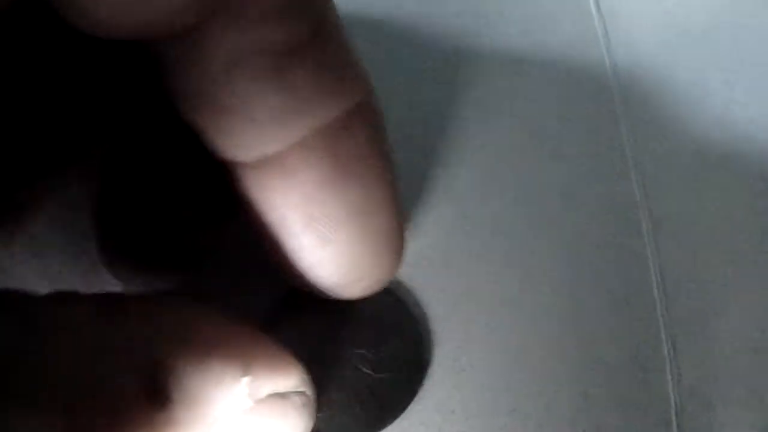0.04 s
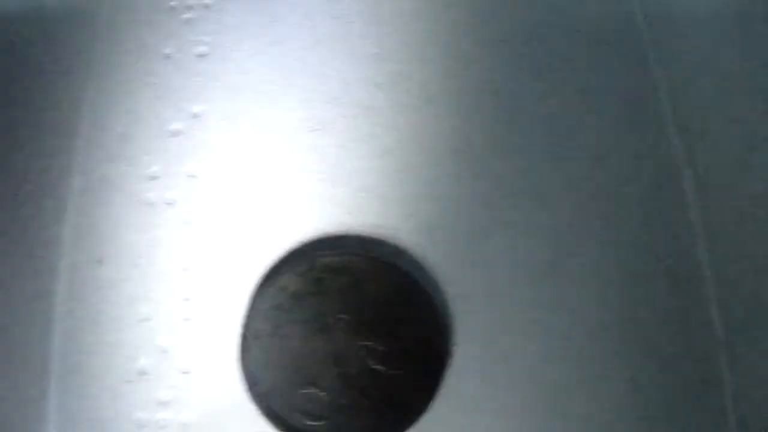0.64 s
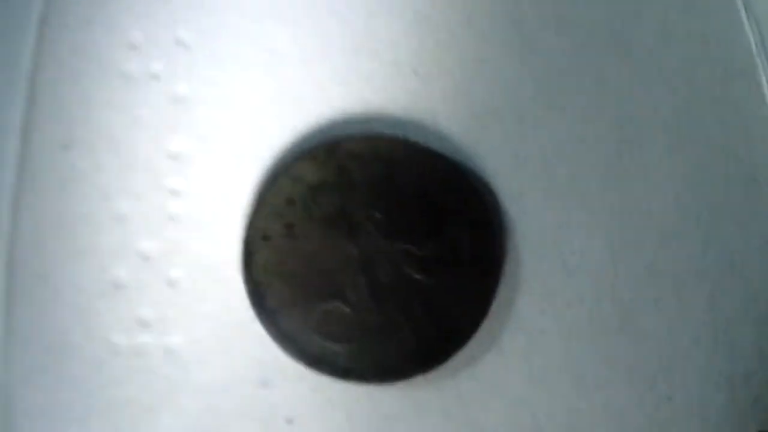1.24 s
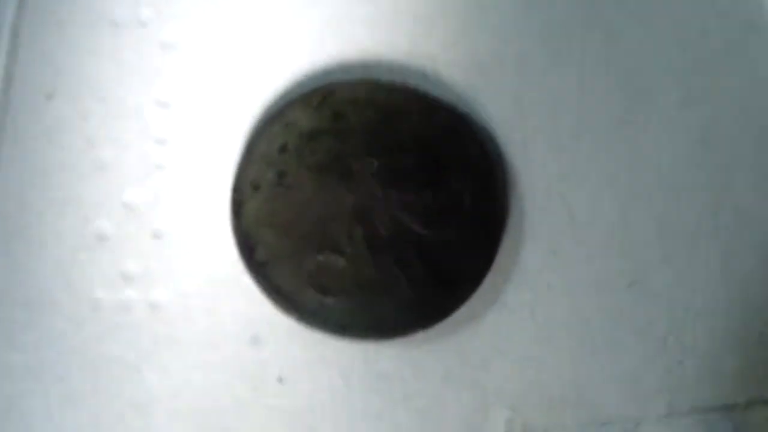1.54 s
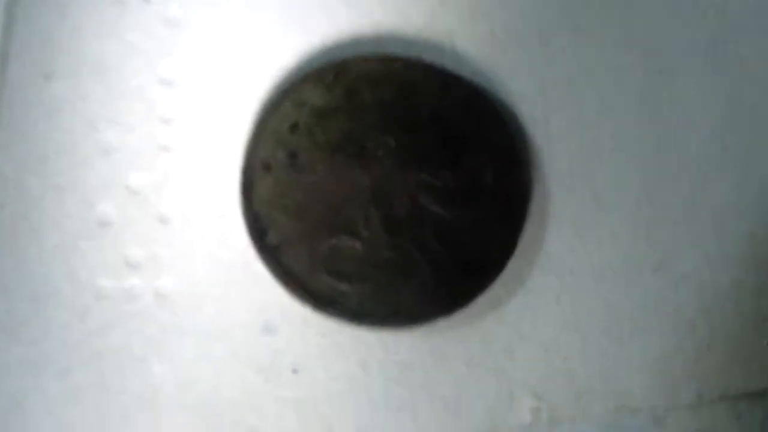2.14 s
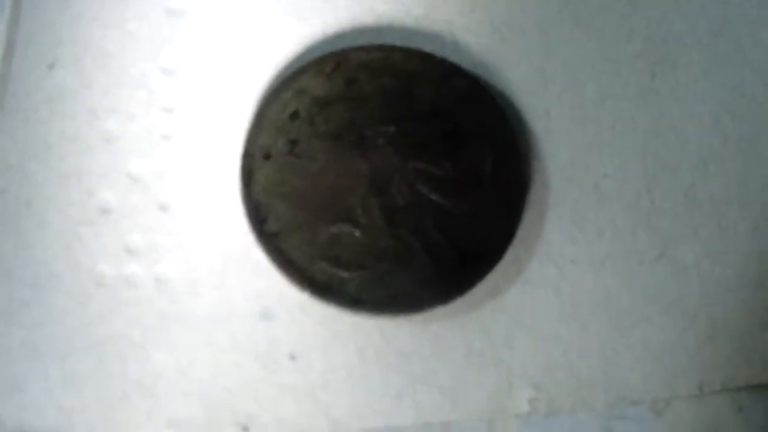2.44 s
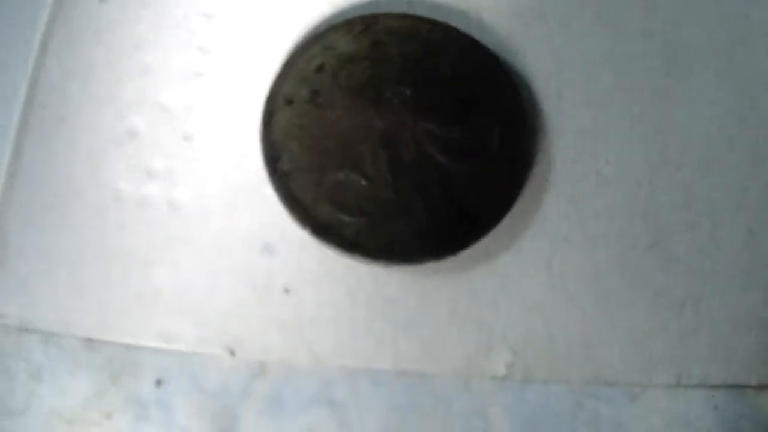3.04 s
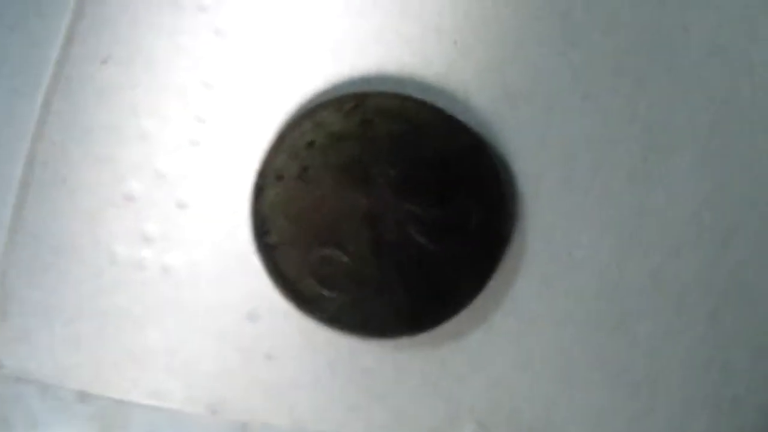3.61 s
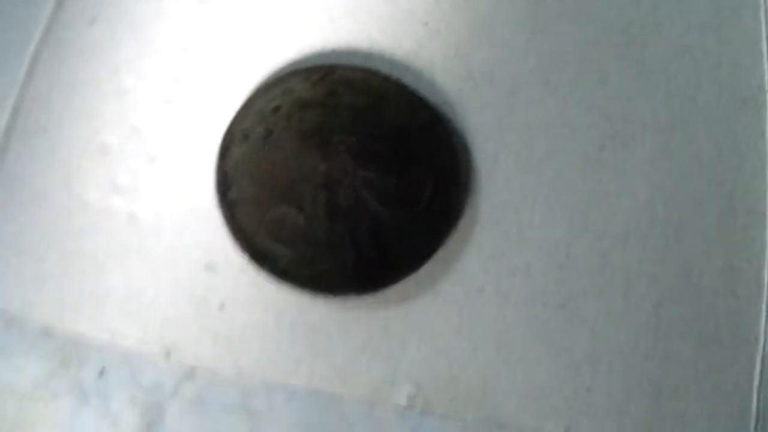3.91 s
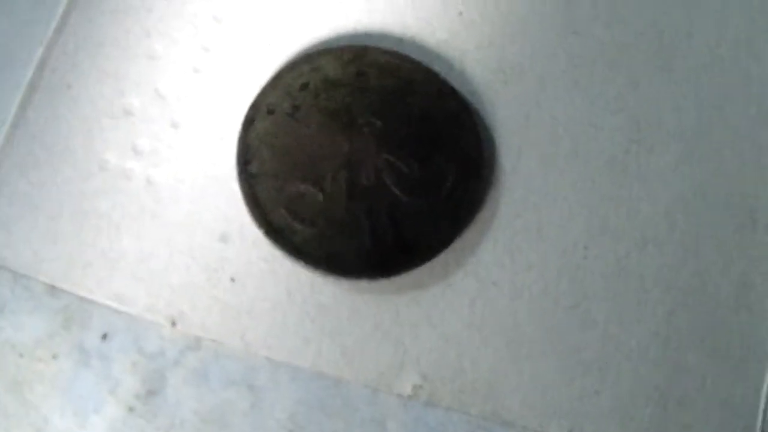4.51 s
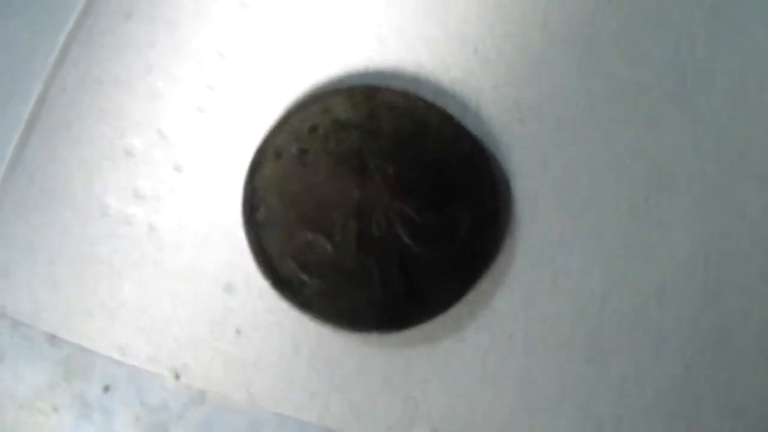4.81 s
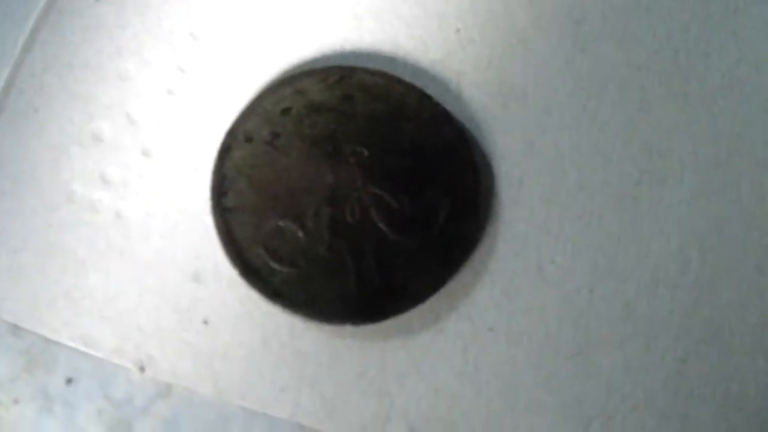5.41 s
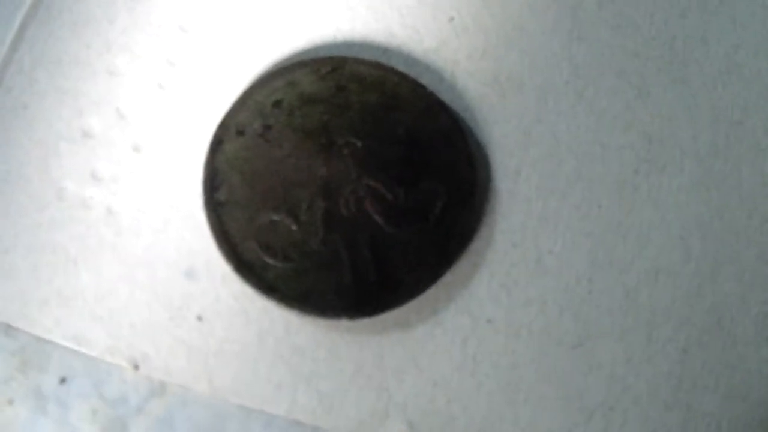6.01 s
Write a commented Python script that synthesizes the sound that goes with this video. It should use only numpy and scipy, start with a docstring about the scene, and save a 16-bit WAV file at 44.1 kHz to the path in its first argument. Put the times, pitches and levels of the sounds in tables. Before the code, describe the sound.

Quiet, dry handling noise is picked up from inside a small plastic camera. It opens with brief, hissy finger strokes on paper and on the casing, mixed with light ticks. After a short pause, a single sharp knock stands out as the loudest sound. The hand then scuffs on the plastic and a seam creaks in tiny slips between occasional clicks, until only the faint, constant microphone hiss remains.

```python
"""Soft finger strokes slide off a paper sheet and rub the plastic shell of a small hand-held camera.
The rubbing is skin friction; light clicks and one hard knock ring the shell's modes.
After the knock the grip scuffs and a seam creaks in small slips. The microphone sits inside
the shell, so all is dry, over a steady electronic hiss."""
import sys
import numpy as np
from scipy import signal
from scipy.fft import rfft, irfft
from scipy.io import wavfile
from scipy.ndimage import uniform_filter1d

SR = 44100
rng = np.random.default_rng(int(sys.argv[2]) if len(sys.argv) > 2 else 0)


def output_pcm(signal):
    """Save a mono or channel-first signal as 16-bit PCM at the path in sys.argv[1].

    Samples are clipped to [-1, 1] before scaling.
    """
    pcm = np.clip(np.atleast_2d(signal).T, -1, 1) * 32767
    wavfile.write(sys.argv[1], SR, np.round(pcm).astype(np.int16))


N = 276066
TIME = np.arange(N) / SR


def clicks(chatter_t60_s=0.014, soft_hz=1460, soft_chatter_db=-8, chatter_db_per_octave=6.5):
    """Each blow rings the shell; its edges chatter briefly, more after a hard contact."""
    # Each row: start in seconds, ring level in dB rms over 10 ms, high-pass in Hz, low-pass in Hz,
    # note of the struck spot in Hz, its boost in dB.
    blows = [(.7372, -37.5, 2220, 900, 1550, 36), (0.935, -47.5, 1900, 1300, 1520, 24),
             (1.665, -40.5, 218, 2900, 4080, 11.5), (1.806, -40, 1900, 3220, 1510, 13.5),
             (1.875, -47, 1110, 5500, 1940, 9), (3.1226, -16, 438, 1140, 2050, 10),
             (3.167, -50.5, 900, 1500, 1950, 19), (3.3141, -29.5, 754, 8500, 2590, 17.5),
             (3.8646, -51.5, 900, 2500, 1830, 12), (4.6608, -30.5, 1550, 6760, 1500, 7.5),
             (4.7762, -43.5, 300, 1610, 1610, 18), (5.3804, -31, 1140, 2130, 2660, 8.5),
             (5.391, -42, 1200, 1300, 2685, 10)]
    out, t = np.zeros(N), TIME[:SR // 10]
    for start_s, db, low_hz, high_hz, spot_hz, spot_db in blows:
        chatter = rng.standard_normal(len(t)) * gain_of(-60 * t / chatter_t60_s)
        chatter = cut(chatter, hz=700, kind="high", order=1)
        chatter = cut(chatter, hz=12500, kind="low", order=2)
        chatter_db = soft_chatter_db + chatter_db_per_octave * np.log2(high_hz / soft_hz)
        shell = shell_ring(low_hz, high_hz, spot_hz, spot_db)
        add(out, start_s, gain_of(db) * (shell + gain_of(chatter_db) * chatter))
    return out


def shell_ring(low_hz, high_hz, spot_hz, spot_db, lag_hz=1500):
    """Struck shell: a small contact drives no bass, a soft one no treble; each spot has its own note."""
    # Each row: mode frequency in Hz, level in dB, t60 in seconds.
    shell_modes = [(250, -8.5, .036), (347, -8, 0.033), (392, -12, 0.034), (593, -8, 0.042),
                   (840, -22, 0.056), (1096, 0, 0.028), (1302, -2.5, 0.018), (1496, -11, 0.013),
                   (1910, -13, 0.022), (2140, -11, 0.022), (2490, -5, 0.013), (3100, 7, 0.0026),
                   (4270, 6.5, 0.0041), (5780, -22, 0.02), (7550, 6.5, 0.0039), (10430, -8, .005)]
    sound = cut(ring(shell_modes), high_hz, "low", order=2)
    sound = cut(sound, low_hz, "high", order=3)
    spot_band = signal.lfilter(*signal.iirpeak(spot_hz, Q=8, fs=SR), sound)
    sound = sound + (gain_of(spot_db) - 1) * spot_band
    # All-pass: slower bending waves bring the mids in just after the treble.
    sound = 2 * signal.lfilter(*signal.iirpeak(lag_hz, Q=1.84, fs=SR), sound) - sound
    first_10_ms = sound[:SR // 100]
    return sound / np.sqrt(np.mean(first_10_ms ** 2))


def rubs(pad_hz=3950, pad_body_db=-8, body_db_per_octave=-5.5):
    """Finger strokes: pressing scrapes and stirs the shell, light fast sliding only hisses."""
    # Each row: peak time in seconds, half length in seconds, level in dB, pressure from 0 to 1,
    # scrape resonance in Hz, skin hiss resonance in Hz.
    finger_strokes = [(0.033, 0.032, -40, .58, 2950, 4040), (.128, 0.012, -38.5, 0.64, 1730, 4000),
                      (0.228, 0.056, -49.5, .68, 2620, 3930), (.335, 0.02, -49, 0.68, 2380, 4000),
                      (0.521, 0.023, -49.5, 0.64, 1940, 5000), (0.636, 0.015, -44.5, .5, 2570, 6200),
                      (0.699, 0.0027, -45.5, .08, 2500, 5960), (0.869, 0.11, -52, .08, 2500, 12200),
                      (1.153, 0.0048, -41.5, 0.48, 2250, 8000), (1.166, 0.0075, -40, 0.73, 2280, 8060),
                      (1.224, 0.065, -52.5, 0.66, 2260, 8000), (1.342, .028, -52, 0.35, 2440, 8500),
                      (1.563, .03, -43.5, 0.44, 2910, 6360), (1.587, 0.022, -41, 0.29, 3000, 10600),
                      (1.672, 0.017, -43, 0.47, 1290, 4200), (1.726, 0.088, -48, 0.5, 1640, 7060),
                      (1.826, 0.02, -48.5, 0.38, 2000, 10900), (1.896, 0.021, -46, 0.53, 1690, 8300),
                      (2.044, 0.03, -45.5, 0.58, 1650, 10900)]
    out = np.zeros(N)
    for peak_s, half_s, db, pressure, scrape_hz, skin_hz in finger_strokes:
        # A flat pad hisses low and stirs the shell; a fingertip hisses high and hardly stirs it.
        body_db = pad_body_db + body_db_per_octave * np.log2(skin_hz / pad_hz)
        gains = gain_of(db) * np.array([gain_of(body_db) * pressure, pressure, 1 - pressure])
        add(out, *stroke(peak_s, half_s, half_s, gains, scrape_hz, skin_hz, resonance_db=8.5))
    return out


def stroke(peak_s, rise_s, fall_s, gains, scrape_hz, skin_hz, resonance_db):
    """Friction swells and fades in three colours: shell body, scrape, skin hiss. Returns start, sound."""
    # Three spectra. Each row: frequency in Hz, relative density in dB.
    body_spectrum = [(60, -44), (180, -3), (350, 6.5), (500, 4.5), (680, 7.5), (1000, -4.5), (1500, -32)]
    scrape_spectrum = [(600, -42), (1100, 5), (1600, 4.5), (2300, 3), (2900, 2.5), (4000, -3), (7000, -13)]
    skin_spectrum = [(2000, -77), (3600, 3.5), (5000, 4), (7000, 5.5), (10000, 3.5), (14000, 4)]
    start_s = max(peak_s - 0.5, 0)
    t = start_s + TIME[:SR]
    width_s = np.where(t < peak_s, rise_s, fall_s)
    swell = np.exp(-0.5 * ((t - peak_s) / width_s) ** 2)
    body = coloured(friction(len(t)), body_spectrum)
    scrape = coloured(friction(len(t)), scrape_spectrum, resonance=(scrape_hz, resonance_db, 0.24))
    skin = coloured(friction(len(t)), skin_spectrum, resonance=(skin_hz, resonance_db, 0.22))
    return start_s, swell * (gains @ np.array([body, scrape, skin]))


def friction(samples, grains_per_s=2500, slide_gain=0.94, grip_db=1.5):
    """Skin ridges catch in tiny grains over a smooth slide, gripping unevenly every few milliseconds."""
    grains = rng.standard_normal(samples) * (rng.random(samples) < grains_per_s / SR)
    grip = unit_rms(uniform_filter1d(rng.standard_normal(samples), size=200))
    slide = slide_gain * rng.standard_normal(samples)
    return (unit_rms(grains) + slide) * gain_of(grip_db * grip)


def creaks(step_s=0.00368, jitter_steps=0.17, pitch_spread=0.062, lead_db=-5.5, scatter_db=3.8):
    """The gripped seam slips, each time at a different tension; longer creaks have lead-in steps."""
    # Each row: mode frequency in Hz, level in dB, t60 in seconds.
    seam_modes = [(310, -21, 0.013), (384, -0.5, 0.079), (547, -2, .02), (670, 7.5, 0.024),
                  (820, -0.5, 0.012), (1026, 0, 0.032)]
    # Each row: time of the last step in seconds, its peak in dB, build-up in seconds.
    slips = [(3.9895, -50, .002), (4.0218, -42, .002), (4.1636, -43.5, .002), (4.21, -40.5, .002),
             (4.4322, -41.5, .002), (4.5044, -41, .002), (4.6134, -36.5, .002), (4.7112, -33.5, .01),
             (4.7902, -37.5, .002), (4.8528, -39, .002), (4.8678, -34, .002), (5.026, -32, .0115),
             (5.2296, -33, .01)]
    out = np.zeros(N)
    for last_s, db, build_s in slips:
        for k, (tension, timing, size) in enumerate(rng.standard_normal((8, 3))):
            if k * step_s > build_s:
                break
            step = ring(seam_modes, pitch_ratio=np.exp(pitch_spread * tension))
            step = cut(step, hz=1250, kind="low", order=2)
            step = cut(step, hz=290, kind="high", order=2)
            early_s = step_s * (k + jitter_steps * timing) if k else 0
            offset_db = lead_db + scatter_db * size if k else 0
            add(out, last_s - early_s, gain_of(db + offset_db) * step / abs(step).max())
    return out


def scuffs(rise_s=0.004, body_db=0.5, skin_db=-3):
    """The gripping hand slips in short jerks that go straight into the shell."""
    # Each row: peak time in seconds, fade in seconds, scrape level in dB.
    jerks = [(3.142, 0.027, -54), (3.655, 0.0039, -55.5), (3.723, 0.0025, -58), (3.926, 0.01, -55.5),
             (3.971, 0.013, -56), (4.039, 0.0068, -51.5), (4.099, .008, -54.5), (4.224, 0.017, -48),
             (4.3, 0.02, -52), (4.362, 0.014, -53), (4.434, 0.024, -58.5)]
    out = np.zeros(N)
    for peak_s, fade_s, db in jerks:
        gains = gain_of(db) * gain_of([body_db, 0, skin_db])
        add(out, *stroke(peak_s, rise_s, fade_s, gains, scrape_hz=2120, skin_hz=8650, resonance_db=3.5))
    return out


def sway():
    """The hard knock leaves the camera swaying briefly in the hand."""
    return dying_tone(start_s=3.123, hz=32, db=-48, t60_s=0.37)


def ping():
    """A faint thin ring lingers after the last click."""
    return dying_tone(start_s=5.382, hz=3612, db=-62, t60_s=0.46)


def hiss(settled_db=-55.5, start_boost_db=4, settle_s=3.96):
    """Microphone noise that starts a little high and settles, with faint hum and whine."""
    # Each row: frequency in Hz, relative density in dB.
    noise_spectrum = [(12, -70), (20, -3), (38, -1.5), (60, -5), (85, -2.5), (195, -4), (263, -3.5),
                      (356, -4.5), (481, -5), (832, -5.5), (903, -4.5), (1950, -10), (6150, -14.5),
                      (8320, -14.5), (14000, -15.5)]
    # Each row: centre in Hz, width in Hz, level in dB rms.
    hum_bands = [(89.4, 14, -74.5), (1075, 180, -73.5), (8200, 130, -75.5)]
    level_db = settled_db + start_boost_db * np.exp(-TIME / settle_s)
    out = coloured(rng.standard_normal(N), noise_spectrum) * gain_of(level_db)
    bins_hz = np.fft.rfftfreq(N, 1 / SR)
    for centre_hz, width_hz, db in hum_bands:
        band = np.exp(-2 * ((bins_hz - centre_hz) / width_hz) ** 2)
        hum = irfft(rfft(rng.standard_normal(N)) * band, N)
        out += gain_of(db) * unit_rms(hum)
    return out


def ring(modes, pitch_ratio=1):
    """Damped sines, all set off together."""
    t = TIME[:SR // 10]
    return sum(gain_of(db - 60 * t / t60_s) * np.sin(2 * np.pi * hz * pitch_ratio * t)
               for hz, db, t60_s in modes)


def dying_tone(start_s, hz, db, t60_s):
    """One damped sine on a full-length track."""
    out, t = np.zeros(N), TIME[:SR // 2]
    add(out, start_s, gain_of(db - 60 * t / t60_s) * np.sin(2 * np.pi * hz * t))
    return out


def coloured(x, spectrum, resonance=None):
    """Shapes x by a spectrum and an optional resonance (Hz, dB, width in octaves), at rms 1."""
    hz, db = np.transpose(spectrum)
    bins_hz = np.fft.rfftfreq(len(x), 1 / SR) + 1
    shape_db = np.interp(np.log(bins_hz), np.log(hz), db)
    if resonance:
        peak_hz, peak_db, octaves = resonance
        shape_db += peak_db / (1 + (np.log2(bins_hz / peak_hz) / octaves) ** 2)
    return unit_rms(irfft(rfft(x) * gain_of(shape_db), len(x)))


def cut(x, hz, kind, order):
    """Causal low-pass or high-pass."""
    return signal.sosfilt(signal.butter(order, hz, kind, fs=SR, output="sos"), x)


def gain_of(db):
    """Decibels to amplitude."""
    return 10 ** (np.asarray(db) / 20)


def unit_rms(x):
    """Scales to rms 1."""
    return x / np.sqrt(np.mean(x ** 2) + 1e-20)


def add(mix, start_s, sound):
    """Mixes a sound in at start_s."""
    part = mix[round(start_s * SR):][:len(sound)]
    part += sound[:len(part)]


def scene():
    """All sources at one microphone."""
    return (hiss() + rubs() + scuffs() + clicks() + creaks() + sway() + ping())[None]


def record(dry):
    """Steep low-pass."""
    edge_hz = 14280
    taps = signal.firwin(511, edge_hz, window=("kaiser", 8), fs=SR)
    return signal.oaconvolve(dry, taps[None], "same")


dry = scene()
out = record(dry)
output_pcm(out)
```